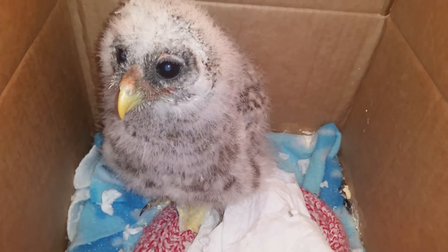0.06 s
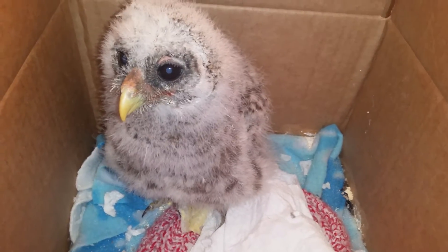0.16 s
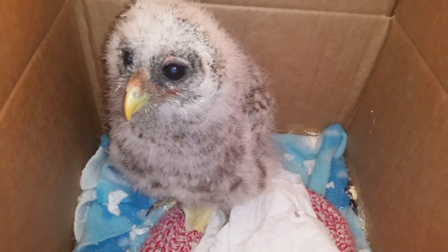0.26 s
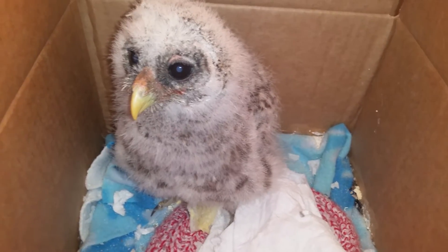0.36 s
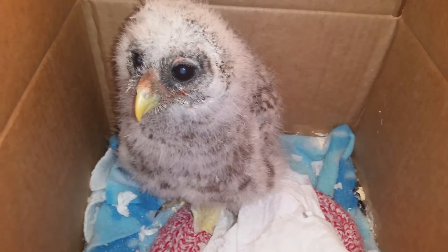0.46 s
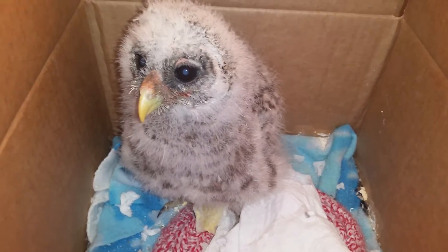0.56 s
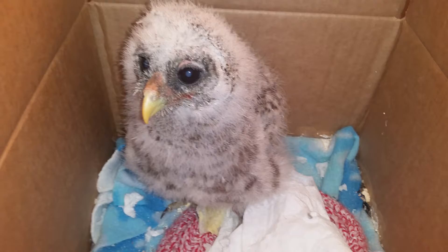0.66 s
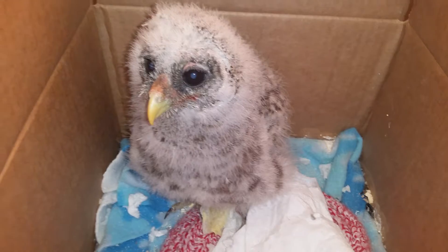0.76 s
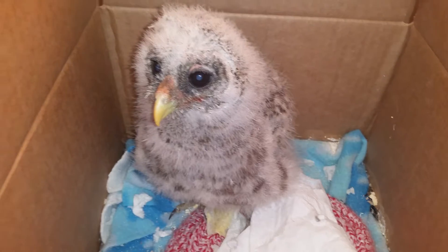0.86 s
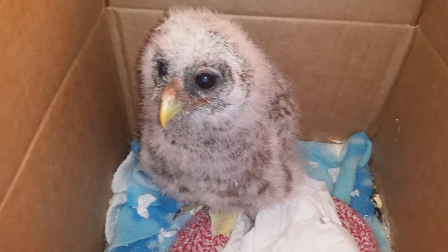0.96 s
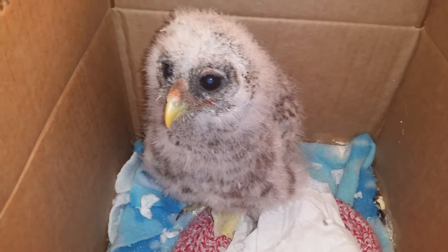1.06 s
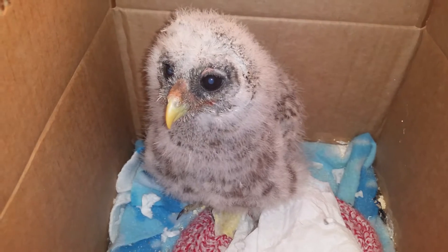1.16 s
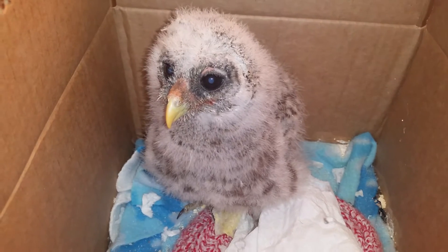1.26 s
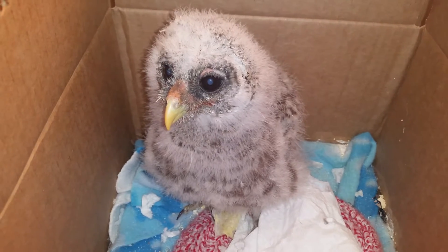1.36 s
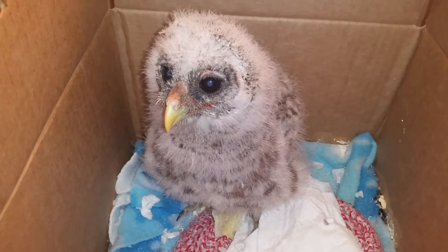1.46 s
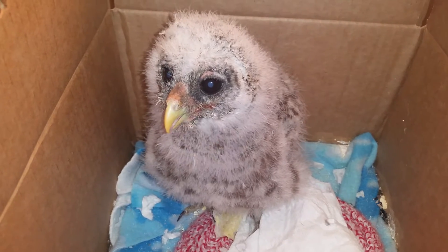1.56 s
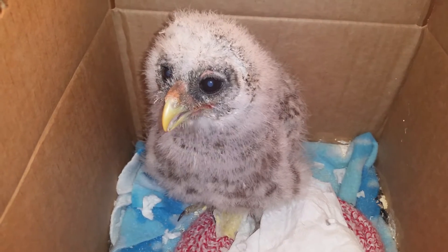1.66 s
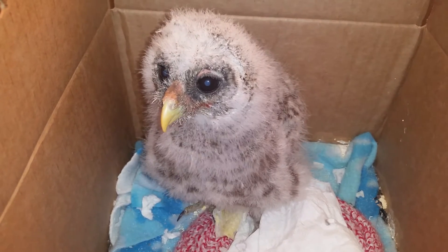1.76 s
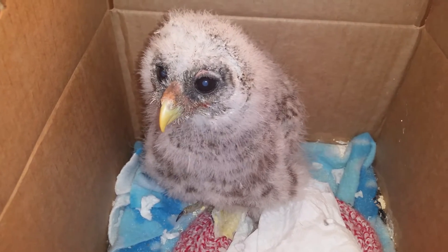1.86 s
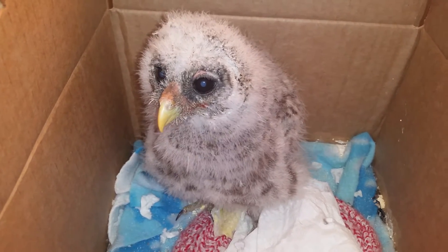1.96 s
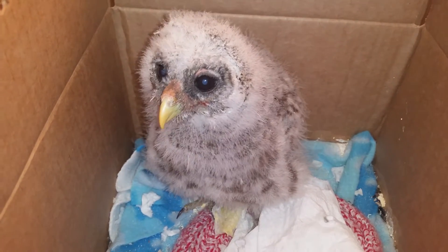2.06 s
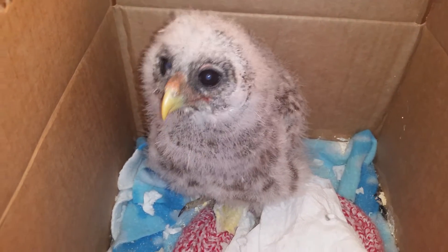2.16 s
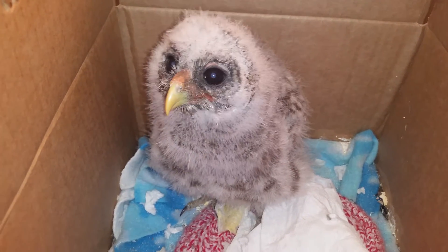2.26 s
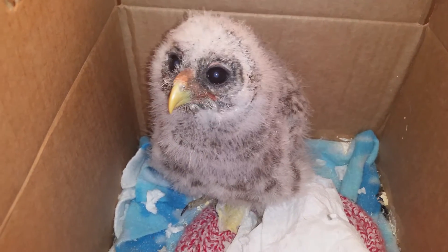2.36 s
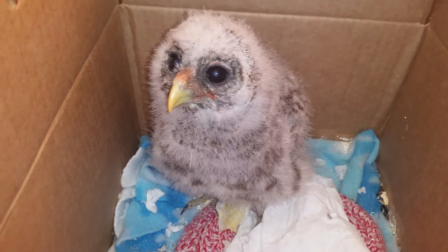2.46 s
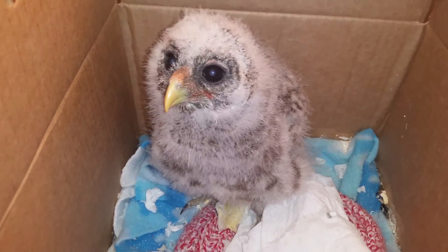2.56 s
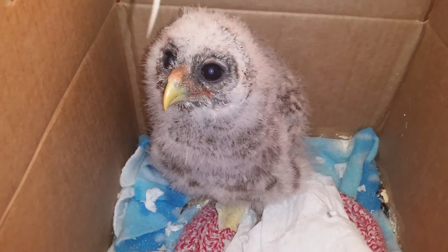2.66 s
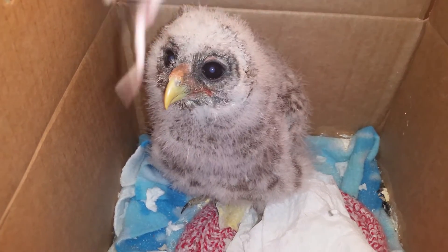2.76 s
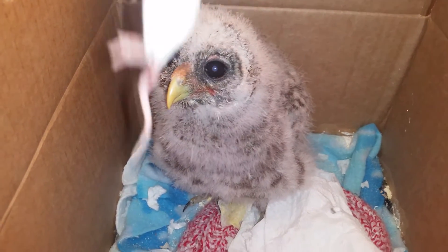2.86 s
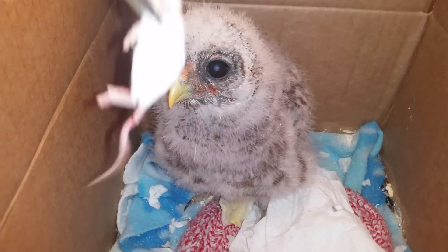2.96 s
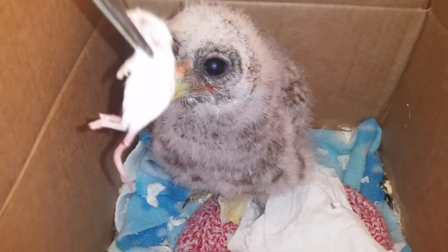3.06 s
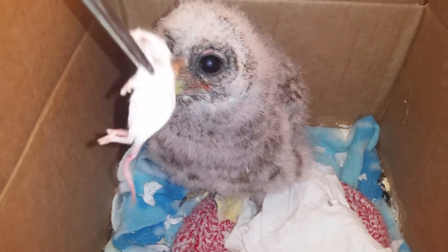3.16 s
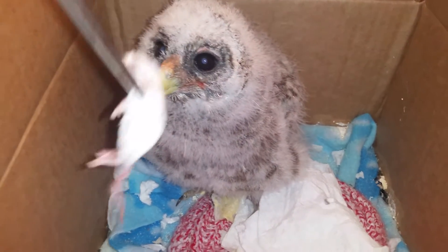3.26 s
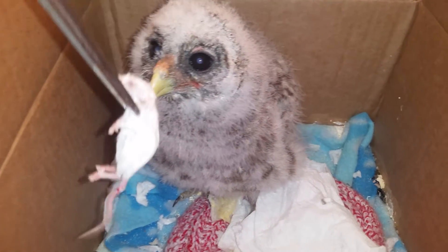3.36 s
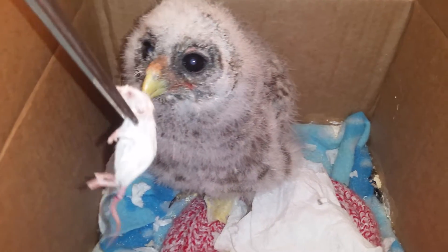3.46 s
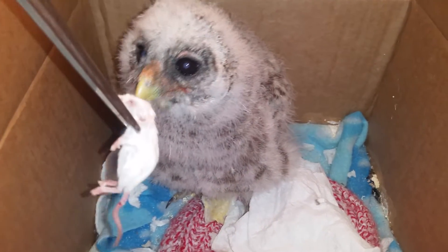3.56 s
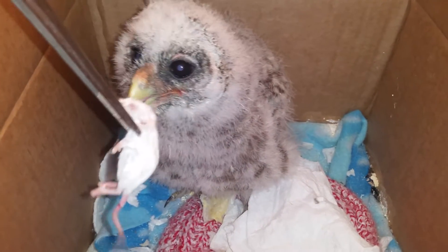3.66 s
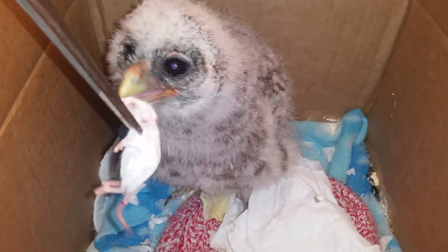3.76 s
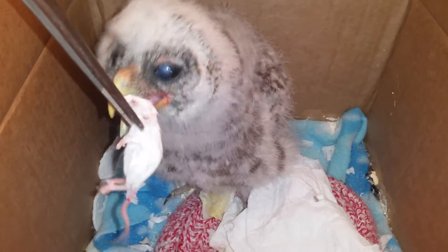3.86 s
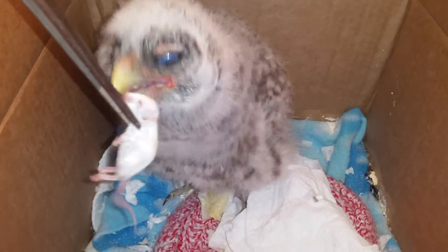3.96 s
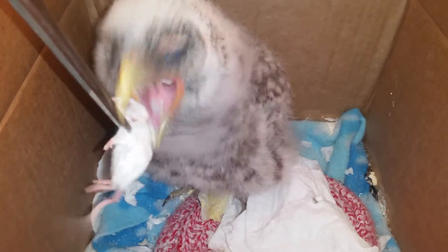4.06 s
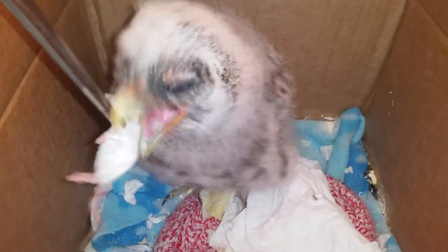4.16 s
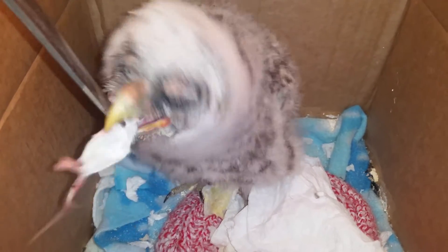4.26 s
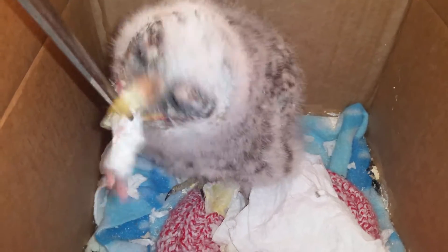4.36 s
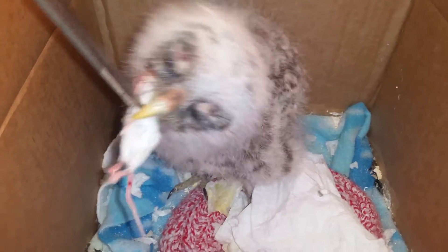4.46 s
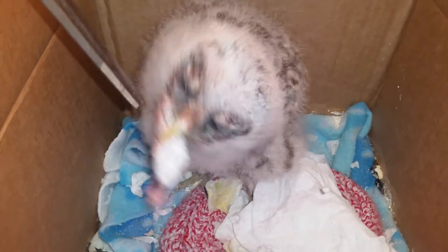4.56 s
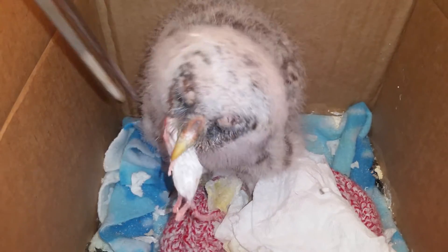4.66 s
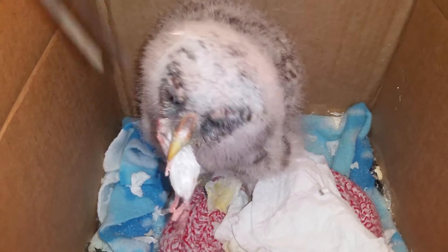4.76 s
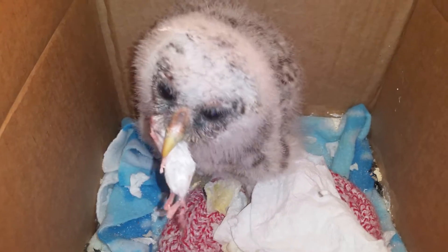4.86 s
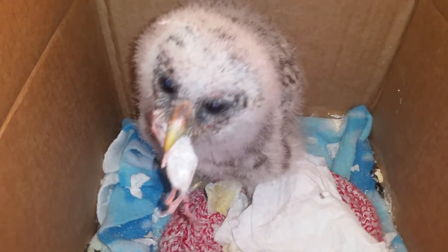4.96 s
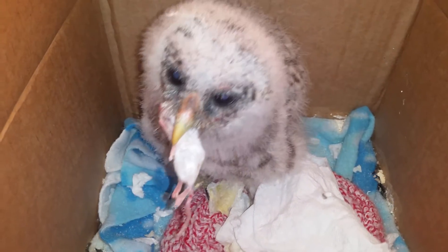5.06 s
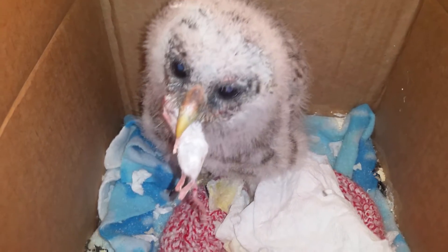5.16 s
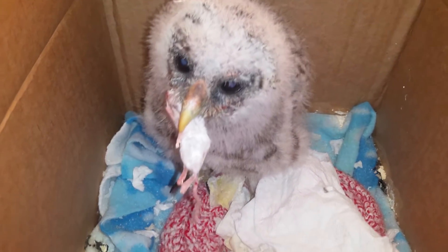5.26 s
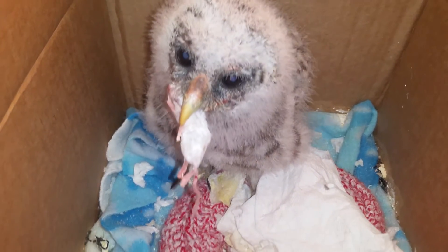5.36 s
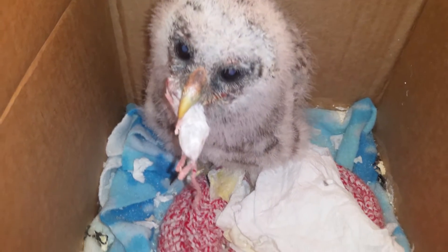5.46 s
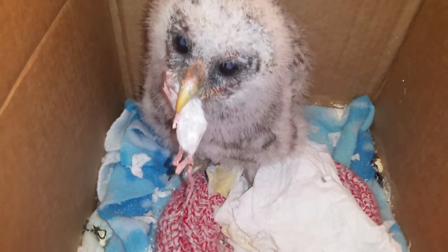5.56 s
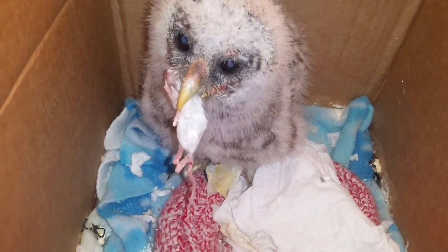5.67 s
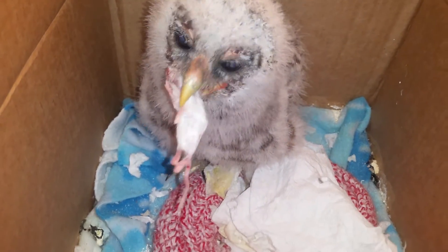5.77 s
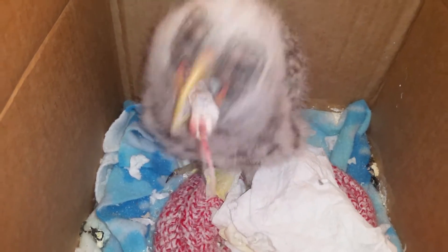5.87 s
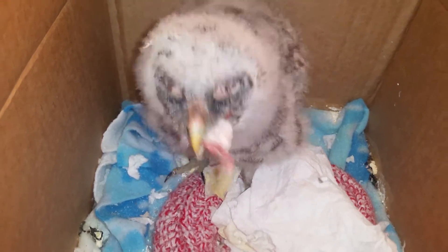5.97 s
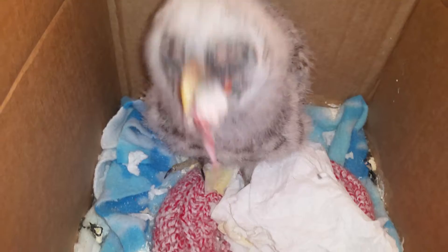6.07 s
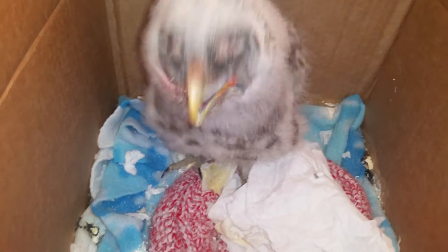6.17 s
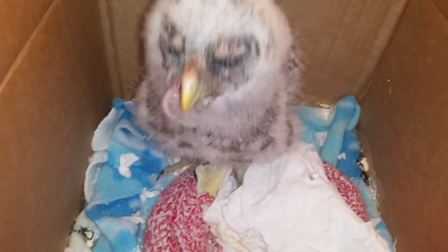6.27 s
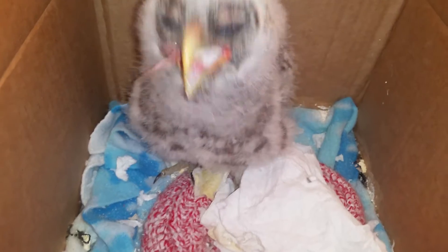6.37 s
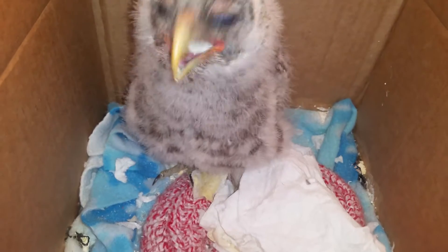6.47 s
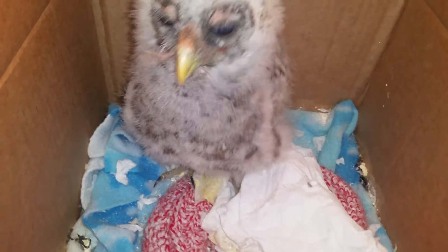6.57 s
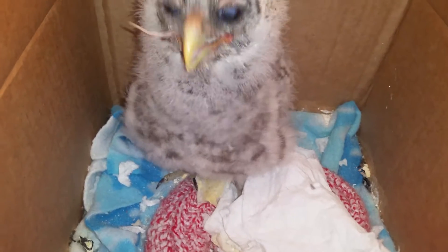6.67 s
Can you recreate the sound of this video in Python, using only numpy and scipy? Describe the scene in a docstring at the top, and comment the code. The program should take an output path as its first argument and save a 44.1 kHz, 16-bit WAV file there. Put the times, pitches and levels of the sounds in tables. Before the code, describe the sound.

In a quiet room, a fluffy owl chick in a cardboard box gives a soft hissy whistle, then a piercing raspy screech, with small bumps and rustles.

```python
"""A quiet room rumble and a faint high hiss, then an owl chick in a cardboard box begs twice:
a soft hiss with a thin whistle, then a loud screech as it takes food.
The two sides of its syrinx are sine voices that beat, mix and roughen into rasp over noise shaped as rushing air.
Bumps on the box and beak clicks are short bursts of resonant noise, between the calls, during the loud one
and after it; rustling bedding is fluttering noise, and the room is steady coloured noise."""
import sys
import numpy as np
from scipy import signal
from scipy.fft import rfft, irfft, next_fast_len
from scipy.io import wavfile

SR = 44100
rng = np.random.default_rng(int(sys.argv[2]) if len(sys.argv) > 2 else 0)


def master_out(mix):
    """Clip the mix to full scale and print it as 16-bit PCM to the path in sys.argv[1]."""
    frames = np.transpose(np.atleast_2d(mix))
    ceiling = np.clip(frames, -1, 1)
    pcm = np.round(ceiling * 32767).astype(np.int16)
    wavfile.write(sys.argv[1], SR, pcm)


N = 296087
T = np.arange(N) / SR  # time [s]

UPPER_LATE_S = 0.0174  # the upper voice joins this long after either call starts

# soft call, upper voice: (time [s], pitch before scoop and sag [Hz], level [dB])
SOFT_UPPER_VOICE = [(1.89, 5795, -50), (1.922, 5620, -44.5), (2.022, 5630, -36.5), (2.058, 5610, -44),
                    (2.19, 5550, -43.5), (2.41, 5710, -36.5), (2.56, 5655, -43)]
# soft call, lower voice: (time [s], level [dB])
SOFT_LOWER_VOICE = [(1.93, -44.5), (2.0, -37), (2.04, -43), (2.19, -43.5), (2.3, -54), (2.56, -60),
                    (2.6, -48)]
# soft call, colour of the air: (frequency [Hz], relative level [dB], left minus right [dB])
SOFT_AIR_COLOUR = [(200, -18, -1), (1070, 0.5, 3), (1530, -9, 0), (3020, -8.5, -4.5), (3670, -7.5, -3),
                   (4570, -2.5, -2), (6060, -11, 5), (7260, -4, 3.5), (9140, -1, 11.5), (9650, -8, -12),
                   (12700, -12, -13), (16000, -15, 2)]
SOFT_LOWER_HZ = 4630  # before scoop and sag
SOFT_START_S, SOFT_END_S = 1.825, 2.648
SOFT_AIR_START_DB, SOFT_SWELL_DB_PER_S = -47.5, 9
SCOOP, SCOOP_S = 0.15, 0.07  # the pitch starts low by this share and scoops up over this time


def soft_call():
    """Two thin breathy whistles in swelling air; a squeak just over the lower one's octave ends the call."""
    air_db = SOFT_AIR_START_DB + SOFT_SWELL_DB_PER_S * (T - SOFT_START_S)
    scoop = 1 - SCOOP * (1 - ramp(SOFT_START_S, SCOOP_S)) ** 2
    glide = scoop * sag(SOFT_END_S, length_s=0.11)
    high_hz, high_db = curves(SOFT_UPPER_VOICE)
    low_db, = curves(SOFT_LOWER_VOICE)
    low_hz, high_hz = SOFT_LOWER_HZ * glide, high_hz * glide
    low_rough = roughness(low_db, air_db, level_rough=0.37)
    high_rough = roughness(high_db, air_db, level_rough=0.22)

    low = membrane(low_hz, low_db, low_rough, pan_db=-4, jitter_hz=400, jitter_rate=1600, shimmer=0.6)
    high = membrane(high_hz, high_db, high_rough, pan_db=0, jitter_hz=380, jitter_rate=1200, shimmer=0.6)
    squeak = membrane(2.105 * low_hz, db=-42.5, rough=0.49, pan_db=9.5,
                      jitter_hz=610, jitter_rate=1700, shimmer=0.5)
    drive_db = (low_db + air_db) / 2
    mixes = undb(-5.5) * combination_tones(
        0, (low_hz, drive_db, low_rough), (high_hz, drive_db, high_rough), jitter_hz=298)
    rush = air(SOFT_AIR_COLOUR, likeness=0.42, rasp_db=2) * pan(np.array([3])) * undb(air_db)

    low_env = envelope(SOFT_START_S, SOFT_END_S, attack_s=0.0027, release_s=0.015)
    squeak_env = envelope(2.597, SOFT_END_S, attack_s=0.019, release_s=0.034)
    high_env = envelope(SOFT_START_S + UPPER_LATE_S, 2.61, attack_s=0.06, release_s=0.061)
    air_env = envelope(1.836, 2.63, attack_s=0.035, release_s=0.075)
    return (tone(*low, lead=1.55) * low_env
            + tone(*squeak, lead=0) * squeak_env
            + (tone(*high, lead=0) + mixes) * high_env
            + rush * air_env)


# loud call, lower voice: (time [s], pitch before sag [Hz], level [dB], left minus right [dB])
LOUD_LOWER_VOICE = [(4.217, 4143, -19, 4.5), (4.275, 4450, -22, 11.5), (4.31, 4233, -18, 5),
                    (4.35, 4014, -18.5, -4), (4.395, 4210, -15.5, -2), (4.435, 4220, -19, -6),
                    (4.47, 4246, -13, -5), (4.505, 4152, -14, -8), (4.54, 4736, -31.5, -8),
                    (4.62, 4844, -29.5, 5), (4.92, 4976, -30.5, 2)]
# loud call, upper voice: (time [s], pitch before sag [Hz], level [dB], left minus right [dB])
LOUD_UPPER_VOICE = [(4.228, 5476, -35, 11), (4.265, 5660, -30.5, 15), (4.345, 5306, -25, 15),
                    (4.405, 5457, -25, 12.07), (4.433, 5230, -35.5, 7.3), (4.48, 5396, -24.5, 12),
                    (4.57, 5350, -26, 11), (4.63, 5540, -18.5, 17), (4.685, 6000, -23.5, 17),
                    (4.73, 5866, -27, 6), (4.86, 6090, -33.5, 3), (4.91, 6254, -18, 6),
                    (4.94, 6110, -31.5, 4)]
# side tone near the lower voice: (time [s], offset above the lower voice's pitch [Hz], level [dB]); from the
# break on, the offset is taken from the lower voice's pitch at the break, which the voice then leaves behind
SIDE_TONE = [(4.29, 255, -29), (4.345, 410, -22), (4.395, 250, -25.5), (4.435, 350, -22.5),
             (4.49, 160, -38), (4.515, 152, -21.5), (4.56, 110, -28.5)]
# loud call, colour of the air: (frequency [Hz], relative level [dB], left minus right [dB])
LOUD_AIR_COLOUR = [(204, -9.5, 2), (753, -8, 6), (1085, 3, 0.5), (1430, -13.5, 4), (2246, -0.5, 1.5),
                   (2610, -5.5, -2.5), (3130, 3, 0), (3830, -1.5, -1.5), (4780, 9.5, -1.5), (6200, 1, 8),
                   (7130, -4.5, 6.5), (9770, -7, -1.5), (11780, -4.5, -9.5), (14400, -15, -5),
                   (15710, -7.5, -1)]
LOUD_START_S, LOUD_END_S = 4.21, 4.972
LOUD_AIR_START_DB, LOUD_SWELL_DB_PER_S = -43, 13
BREAK_S, BREAK_LENGTH_S, BREAK_AIR_DB = 4.495, 0.043, 5.5  # the break into rasp lets more air through
# a fainter whistle rides above the upper voice late in the call
TOP_START_S, TOP_END_S, TOP_ABOVE_HZ = 4.645, 4.945, 600
TOP_START_DB, TOP_FADE_DB_PER_S = -26.5, -39


def loud_call():
    """A pip, then two piercing tones; a side tone beats against the lower one, which then breaks into rasp."""
    air_db = LOUD_AIR_START_DB + LOUD_SWELL_DB_PER_S * (T - LOUD_START_S)
    air_db = air_db + BREAK_AIR_DB * ramp(BREAK_S, BREAK_LENGTH_S)
    glide = sag(LOUD_END_S, length_s=0.06)
    low_hz, low_db, low_pan = curves(LOUD_LOWER_VOICE)
    high_hz, high_db, high_pan = curves(LOUD_UPPER_VOICE)
    low_hz, high_hz = low_hz * glide, high_hz * glide
    low_rough = roughness(low_db, air_db, level_rough=0.478)
    high_rough = roughness(high_db, air_db, level_rough=0.19)
    top_db = TOP_START_DB + TOP_FADE_DB_PER_S * np.maximum(T - TOP_START_S, 0)
    beat_hz, side_db = curves(SIDE_TONE)
    side_rough = 0.05 + 0.644 * ramp(BREAK_S, BREAK_LENGTH_S / 2)
    # the side tone stays behind when the lower voice breaks upward
    side_hz = np.interp(np.minimum(T, BREAK_S), T, low_hz) + beat_hz

    low = membrane(low_hz, low_db, low_rough, low_pan, jitter_hz=340, jitter_rate=1600, shimmer=0.35)
    side = membrane(side_hz, side_db, side_rough, pan_db=1, jitter_hz=340, jitter_rate=1600, shimmer=0.35)
    top = membrane(high_hz + TOP_ABOVE_HZ, top_db, high_rough, pan_db=0,
                   jitter_hz=340, jitter_rate=1600, shimmer=0.35)
    high = membrane(high_hz, high_db, high_rough, high_pan, jitter_hz=260, jitter_rate=1300, shimmer=0.4)
    pip = membrane(hz=4400, db=-29.5, rough=0.2, pan_db=12, jitter_hz=340, jitter_rate=1200, shimmer=0.35)

    # the beat also throws weaker bands below and above the pair, and around every combination tone
    low_phase, (side_phase, side_size) = low[0], side
    beating = envelope(LOUD_START_S + UPPER_LATE_S, 4.63, attack_s=0.01, release_s=0.051)
    band_below = undb(-14) * tone(2 * low_phase - side_phase, side_size, lead=2)
    band_above = undb(-18) * tone(2 * side_phase - low_phase, side_size, lead=1)
    mixes = combination_tones(1, (low_hz, (low_db + air_db) / 2, low_rough),
                              (high_hz, (high_db + air_db) / 2, high_rough), jitter_hz=232)
    mixes = mixes * (1 + 0.76 * beating * np.cos(side_phase - low_phase))
    mixes = mixes * undb(-18) * pan(np.array([-4]))
    rush = air(LOUD_AIR_COLOUR, likeness=0.53, rasp_db=2) * undb(air_db)

    pip_env = envelope(4.202, 4.213, attack_s=0.002, release_s=0.007)
    low_env = envelope(LOUD_START_S, LOUD_END_S, attack_s=0.006, release_s=0.0092)
    top_env = envelope(TOP_START_S, TOP_END_S, attack_s=0.044, release_s=0.015)
    high_env = envelope(LOUD_START_S + UPPER_LATE_S, LOUD_END_S, attack_s=0.0068, release_s=0.0093)
    air_env = envelope(LOUD_START_S, 4.965, attack_s=0.11, release_s=0.035)
    return (tone(*pip, lead=0.9) * pip_env
            + tone(*low, lead=0.97) * low_env
            + (tone(*side, lead=1) + band_below + band_above) * beating
            + tone(*top, lead=0.99) * top_env
            + (tone(*high, lead=-1.6) + mixes) * high_env
            + rush * air_env)


def membrane(hz, db, rough, pan_db, jitter_hz, jitter_rate, shimmer):
    """One syrinx voice: roughness shakes its pitch and size. Gives its phase and its left and right size."""
    hz = hz + rough * jitter_hz * (flutter(jitter_rate) + 0.15 * flutter(140))
    shake = rough * shimmer
    size = undb(db) * np.exp(shake * flutter(900) - shake ** 2)  # shaking keeps the mean power
    return 2 * np.pi * np.cumsum(hz) / SR, size * pan(pan_db + np.zeros(N))


def tone(phase, size, lead):
    """A sine in stereo; echoes off the box walls put the left side lead radians ahead."""
    return np.sqrt(2) * size * np.cos(phase + lead / 2 * np.array([[1], [-1]]))


# combination tones: (multiple of lower voice, multiple of upper voice,
#                     level over the drive in the soft call [dB], same in the loud call [dB]), before call trim
COMBINATIONS = [(-1, 1, -6.5, -16.5), (-2, 2, -24, -12), (2, -1, 0, -1), (-1, 2, -7.5, -7.5),
                (3, -2, -27, -22), (2, 0, -3.5, -1.5), (1, 1, -13, 1.5), (0, 2, -2.5, 2),
                (4, -1, -14, -18.5), (2, 1, -6.5, -13.5)]


def combination_tones(call, low, high, jitter_hz):
    """Two voices (pitch, drive dB, roughness) multiply in one airway into octaves, sums and differences."""
    out = 0
    for m, n, *levels_db in COMBINATIONS:
        # the raspier lower side drives and blurs every tone it takes part in
        _, drive_db, rough = low if m else high
        hz = m * low[0] + n * high[0] + jitter_hz * np.sqrt(rough) * flutter(1300)
        phase = 2 * np.pi * np.cumsum(hz) / SR
        size = undb(drive_db + levels_db[call] + 2 * flutter(300))
        out = out + tone(phase, size, lead=1.56)
    return out


def air(throat, likeness, rasp_db):
    """Turbulent air through the open beak crackles with fast puffs; the box colours each side differently."""
    hz, db, pan_db = np.transpose(throat)
    left, right = lagged(pair(likeness) * undb(rasp_db * flutter(500)))
    return np.array([colour(left, np.c_[hz, db + pan_db / 2]),
                     colour(right, np.c_[hz, db - pan_db / 2])])


ROUGHENING = 0.603  # dB of roughness per dB that a tone sinks into the air


def roughness(db, air_db, level_rough):
    """A tone is clean while it stands above the air; level_rough is its roughness when the two are level."""
    return np.clip(level_rough * undb(ROUGHENING * (air_db - db)), 0, 1)


SAG = 0.19  # share of the pitch lost by the end of a call


def sag(end_s, length_s):
    """Pitch drops ever faster as a call runs out."""
    return 1 - SAG * ramp(end_s - length_s, length_s) ** 2


# soft bumps on the box: (time [s], peak before panning [dB], pitch [Hz], t60 [s])
BOX_BUMPS = [(3.087, -30, 230, 0.067), (3.172, -35.5, 205, 0.13), (3.254, -36.5, 216, 0.075),
             (3.398, -41, 125, 0.11), (4.281, -34.5, 63, 0.14), (4.488, -35, 115, 0.21),
             (4.843, -31, 211, .11), (4.846, -31, 600, 0.1), (5.467, -31, 129, 0.15),
             (5.51, -36.5, 100, 0.27), (6.553, -29.5, 102, 0.09)]


def bumps():
    """Soft knocks on cardboard: low, ringing noise bursts with a gentle onset."""
    knocks = contacts(BOX_BUMPS, rise_s=0.0031, sharpness=4.4, likeness=0.77, dull=2.32)
    return knocks * pan(np.array([-3]))


# beak clicks and scratches on cardboard: (time [s], peak [dB], brightest frequency [Hz], t60 [s])
BEAK_CLICKS = [(4.212, -43, 6010, .006), (6.151, -44.5, 750, 0.021), (6.3455, -36.5, 2030, 0.025),
               (6.353, -37, 865, 0.12), (6.482, -25, 2060, 0.02), (6.49, -31, 1470, 0.089),
               (6.6025, -50, 5000, .008), (6.615, -29.5, 4840, 0.0081), (6.657, -40, 1100, .05)]


def clicks():
    """Beak on cardboard: near-instant noise bursts through a very broad resonance."""
    return contacts(BEAK_CLICKS, rise_s=0.0001, sharpness=0.68, likeness=0.1, dull=1.85)


def contacts(rows, rise_s, sharpness, likeness, dull):
    """All blows of one kind; soft material takes off the treble above dull times the resonance."""
    out = np.zeros((2, N + SR))
    for time_s, peak_db, hz, t60 in rows:
        y = blow(hz, t60, rise_s, sharpness, likeness)
        y = signal.sosfilt(signal.butter(3, min(dull * hz, 0.45 * SR), fs=SR, output="sos"), y)
        start = int(time_s * SR)
        out[:, start:start + y.shape[1]] += undb(peak_db) * y / np.abs(y).max()
    return out[:, :N]


def blow(hz, t60, rise_s, sharpness, likeness):
    """A contact: a short fading shudder through one broad resonance."""
    t = T[:SR // 3]
    shudder = rng.standard_normal(len(t)) + (1 - likeness) * rng.standard_normal((2, len(t)))
    push = shudder * (1 - np.exp(-t / rise_s)) * np.exp(-np.log(1000) * t / t60)
    return signal.lfilter(*signal.iirpeak(min(hz, SR / 4), max(sharpness, 0.6), fs=SR), push)


# the chick shuffles, rubbing bedding and down on cardboard: (time [s], length [s], level [dB])
SHUFFLE_MOVES = [(2.56, 0.18, -59), (2.9, 0.49, -65), (4.88, .42, -56.5), (5.301, 0.18, -53),
                 (5.453, 0.048, -42), (5.55, 0.033, -42), (5.55, 0.63, -68.5), (6.24, 0.14, -59),
                 (6.338, .21, -54.5), (6.539, 0.074, -42.5), (6.632, 0.032, -41)]
# colour of the bedding: (frequency [Hz], relative level [dB])
BEDDING_COLOUR = [(100, -12.5), (400, -7.5), (850, 6), (1400, -2.5), (2200, -3), (3000, -5), (4500, 0),
                  (6500, -12.5), (9000, -18), (16000, -22.5)]
# longer shuffles rise and fade more slowly: shares of their length, and the shortest fade time constant
RISE_SHARE, FADE_SHARE, SHORTEST_FADE_S = 0.31, 0.25, 0.029


def rustle():
    """Dense small slips of cloth against the box; soft down adds a thin hiss that grows less with effort."""
    moves = []
    for start_s, length_s, db in SHUFFLE_MOVES:
        rise = ramp(start_s, RISE_SHARE * length_s)
        after_s = np.maximum(T - start_s - length_s, 0)
        fade = np.exp(-after_s / (SHORTEST_FADE_S + FADE_SHARE * length_s))
        moves.append(undb(db) * rise * fade)
    effort = np.max(moves, axis=0)
    slips = lagged(pair(0.11) * undb(2 * flutter(700) + 0.54 * flutter(60)))
    down = colour(pair(0), [(4000, -40), (13000, 0)]) * undb(-42) * effort ** 0.48
    return colour(slips, BEDDING_COLOUR) * effort + down


def room_tail(x, t60=0.378, wet_db=-33):
    """A faint short reverberation from the room above the box: fading noise after a 4 ms gap."""
    t = T[:SR // 2]
    response = rng.standard_normal((2, len(t))) * np.exp(-np.log(1000) * t / t60) * (t > 0.004)
    response /= np.sqrt(np.sum(response ** 2, axis=1, keepdims=True))
    return undb(wet_db) * signal.fftconvolve(x, response, axes=1)[:, :N]


# colour of the room and microphone floor: (frequency [Hz], relative level [dB])
ROOM_COLOUR = [(12, -40.5), (20, -9), (55, -2.5), (124, -2.5), (205, -12.5), (237, -6.5), (269, -14.5),
               (706, -14.5), (947, -23), (3000, -47), (3900, -75.5), (6600, -120)]
# handling stirs the low rumble: (time [s], level over the base [dB])
RUMBLE_STIR = [(0, 3), (1.2, -0.5), (2.2, 3.5), (3.4, 5), (3.7, -1), (4.6, 4), (5.5, 7.5), (5.8, 3),
               (6.7, 6.5)]
# colour of the faint high hiss: (frequency [Hz], relative level [dB])
HISS_COLOUR = [(2500, -21.5), (3300, -16.5), (3900, 3), (4300, 3.5), (4900, -4), (5600, -18.5),
               (6500, -35.5), (9000, -39.5), (13000, -27), (16000, -30)]
RUMBLE_BASE_DB, HISS_DB = -53.5, -62


def background():
    """Low room rumble, partly alike on both sides, and a faint narrow hiss that differs on each side."""
    stir_db, = curves(RUMBLE_STIR)
    rumble = colour(pair(0.58) * undb(0.77 * flutter(13)), ROOM_COLOUR) * undb(RUMBLE_BASE_DB + stir_db)
    hiss = undb(HISS_DB) * colour(pair(0.02), HISS_COLOUR)
    return rumble * pan(np.array([-1.6])) + hiss


def undb(db):
    """Decibels to gain."""
    return 10 ** (np.asarray(db) / 20)


def curves(rows):
    """Each column of a table as a line through time."""
    s, *columns = np.transpose(rows)
    return [np.interp(T, s, c) for c in columns]


def ramp(start_s, length_s):
    """A straight rise from zero to one."""
    return np.clip((T - start_s) / max(length_s, 1 / SR), 0, 1)


def envelope(start_s, end_s, attack_s, release_s):
    """Attack, hold, release."""
    return ramp(start_s, attack_s) * (1 - ramp(end_s - release_s, release_s))


def flutter(rate):
    """Random wander in straight lines, about rate turns a second; spread 1."""
    knots = rng.standard_normal(N)
    return np.interp(T * min(rate, SR / 2), np.arange(N), knots) / np.sqrt(2 / 3)


def pair(likeness):
    """Left and right white noise with the given correlation."""
    mid, side = rng.standard_normal((2, N))
    c = np.clip(likeness, -0.98, 0.98)
    return (np.sqrt(1 + c) * mid + np.sqrt(1 - c) * side * np.array([[1], [-1]])) / np.sqrt(2)


def colour(x, points):
    """Shape a sound by (frequency [Hz], level [dB]) points, then scale it to rms 1."""
    hz, db = np.transpose(points)
    size = next_fast_len(N)
    f = np.maximum(np.fft.rfftfreq(size, 1 / SR), 1)
    gain = undb(np.interp(np.log(f), np.log(hz), db))
    y = irfft(rfft(x, size) * gain, size)[..., :N]
    return y / y.std()


def pan(db):
    """Left and right gains, db apart, of equal total power."""
    g = undb(np.array([db, -db]) / 2)
    return g / np.sqrt(np.mean(g ** 2, axis=0))


RIGHT_LAG_S = 0.00015  # the chick is nearer the left side


def lagged(x):
    """The right side hears it a little later."""
    return np.array([x[0], np.roll(x[1], int(round(RIGHT_LAG_S * SR)))])


def scene():
    """The chick, its movements and the room."""
    near = soft_call() + loud_call() + bumps() + clicks() + rustle()
    return near + room_tail(near) + background()


TOP_HZ = 15850


def record(dry):
    """The recorder cuts the top: a steep low-pass at TOP_HZ."""
    return signal.sosfilt(signal.ellip(10, 0.2, 80, TOP_HZ, fs=SR, output="sos"), dry)


dry = scene()
out = record(dry)
master_out(out)
```